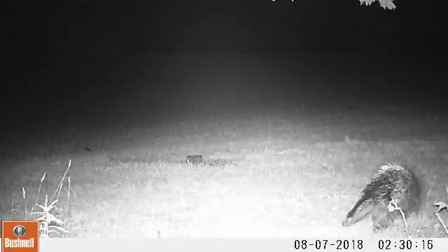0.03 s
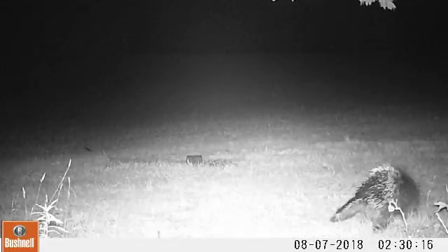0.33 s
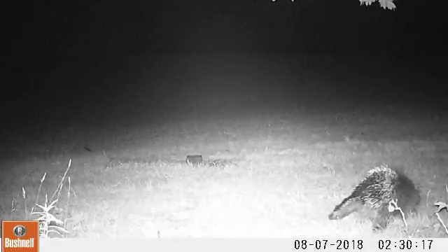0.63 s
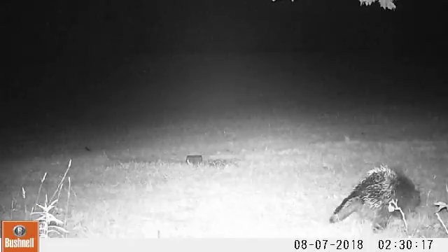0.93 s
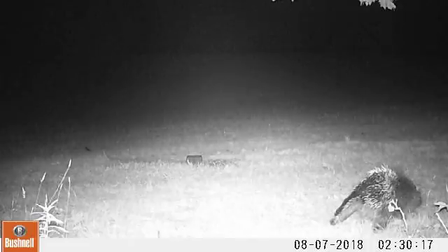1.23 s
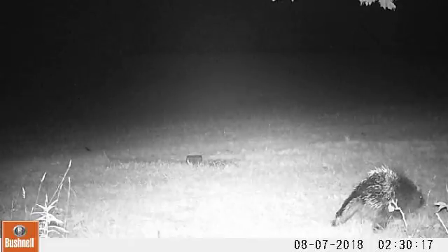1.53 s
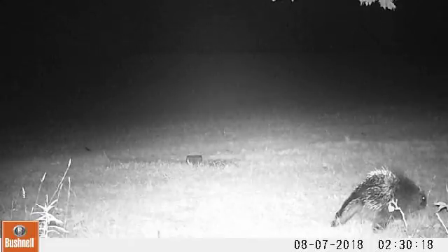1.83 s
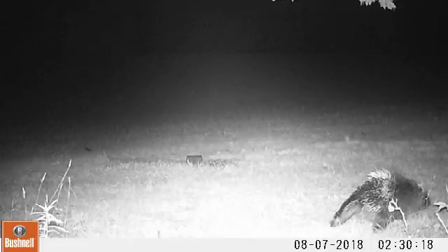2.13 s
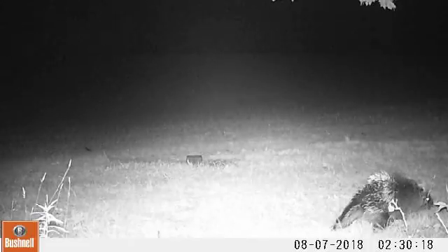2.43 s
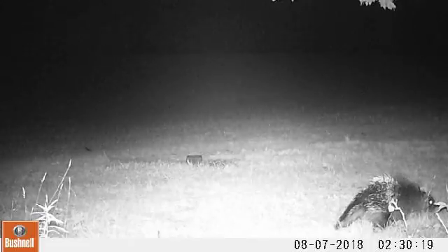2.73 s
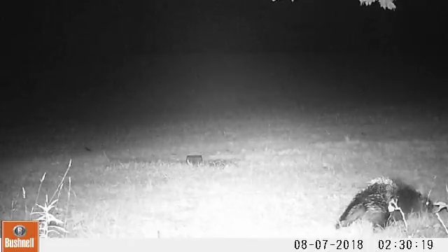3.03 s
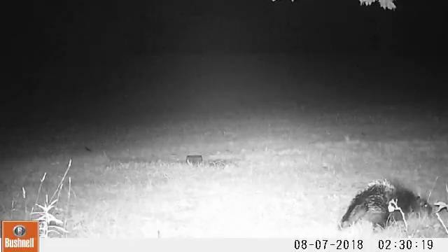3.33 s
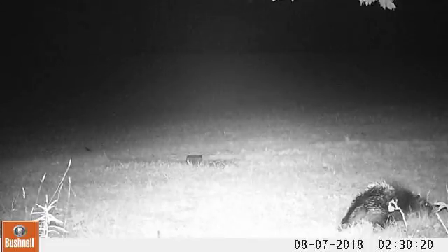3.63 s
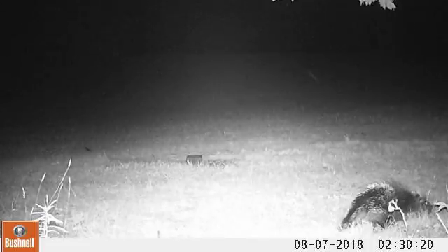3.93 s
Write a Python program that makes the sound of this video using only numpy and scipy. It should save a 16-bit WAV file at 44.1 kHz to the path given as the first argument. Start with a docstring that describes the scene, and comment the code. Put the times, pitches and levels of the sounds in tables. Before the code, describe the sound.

Crickets sound throughout in an open meadow at night. One trills evenly close by, while three others take turns chirping in quick threes, each about twice a second, over a high shimmer of distant insects. Low air rumble, slight hiss and a low electrical throb continue underneath. Faint, hoarse hoots come from far away at about 1.2, 1.7 and 2.4 seconds, with a longer, slightly louder one at 3 seconds.

```python
"""A meadow at night, heard from one camera microphone. From the start there is night air, a little hiss
and the camera's low electrical throb, while far-off trilling insects merge into a high shimmer.
Close by, one cricket trills throughout, every wing stroke a short falling tone; three field crickets
join one after another, chirping in threes. After about a second something far away hoots, faintly,
four times in all. Grass and trees scatter every call."""
import sys
import numpy as np
from scipy import signal
from scipy.fft import rfft, irfft
from scipy.io import wavfile

SR = 44100
rng = np.random.default_rng(int(sys.argv[2]) if len(sys.argv) > 2 else 0)


def dump_mix(stems):
    """Bounce the given channels to the path in sys.argv[1] as a 16-bit WAV at rate SR."""
    frames = np.atleast_2d(stems).T  # one column per channel
    limited = np.clip(frames, -1, 1)  # hard clip at full scale
    pcm = np.round(limited * 32767).astype(np.int16)
    wavfile.write(sys.argv[1], SR, pcm)


N = 176400
T = np.arange(N) / SR


def undb(db):
    """Decibels to gain."""
    return np.exp(np.asarray(db) * np.log(10) / 20)


def level(x, db):
    """Set the rms level."""
    return x * undb(db) / np.sqrt(np.mean(x ** 2))


def walk(rate):
    """A random drift that moves to a new value rate times a second; spread near 1."""
    return 1.2 * np.interp(T * rate, np.arange(256), rng.standard_normal(256))


def colour(x, points):
    """Filter by a curve of (Hz, dB) points."""
    hz, db = np.array(points).T
    bin_hz = np.arange(N // 2 + 1) * SR / N
    curve_db = np.interp(np.log(bin_hz + 1), np.log(hz), db)
    return irfft(rfft(x) * undb(curve_db), N)


def tone(hz, turns=0):
    """A sine that follows a pitch curve."""
    cycles = np.cumsum(hz) / SR + turns
    return np.sin(2 * np.pi * cycles)


def swell(progress):
    """A smooth rise and fall while progress goes from 0 to 1."""
    return np.abs(np.sin(np.pi * np.clip(progress, 0, 1)))


def night_air():
    """The low rumble of open air, with a little microphone hiss above it."""
    # Each row: frequency in Hz, relative noise density in dB.
    spectrum = [(8, -8.5), (18, -0.5), (35, -6.5), (70, -13.5), (140, -24), (280, -27), (420, -30),
                (600, -29), (900, -35), (1400, -39.5), (2100, -41), (3000, -38.5), (4200, -34.5),
                (6500, -39.5), (8800, -59)]
    return level(colour(rng.standard_normal(N), spectrum), db=-52.5)


def camera_throb(rate_hz=20, strong_beat_s=.14):
    """The camera's low electrical buzz, limping in groups of four beats."""
    # Each row: multiple of the beat rate, level in dB before the limp and drift.
    harmonics = [(1, -45), (2, -57), (3, -59), (4, -68), (5, -68.5), (6, -69), (7, -71.5), (8, -70.5),
                 (9, -71.5), (10, -77), (11, -89.5), (12, -79), (13, -80.5)]
    buzz = sum(undb(db) * np.sqrt(2) * tone(np.full(N, round(k) * rate_hz), rng.random())
               for k, db in harmonics)
    groups = (T - strong_beat_s) * rate_hz / 4
    limp = 1 + .18 * np.cos(2 * np.pi * groups)
    return buzz * limp * undb(.78 * walk(8))


def scatter(x, wet_db, t60_s=.29, samples=16384):
    """The direct sound plus a fading wash of echoes from grass and trees."""
    tail = rng.standard_normal(samples) * undb(-60 * T[:samples] / t60_s)
    tail *= undb(wet_db) / np.sqrt(np.sum(tail ** 2))
    return x + irfft(rfft(x) * rfft(tail, N), N)


def trill(strokes, duty, pitch_hz, fall_hz, uneven_db=2.5, detune_hz=14):
    """The wings close once per count of strokes; each closing starts a tone that sags as they slow."""
    stroke = np.floor(strokes).astype(int)
    strength, detune, phase = rng.standard_normal((512, 3))[stroke].T
    progress = (strokes - stroke) / duty
    envelope = swell(progress) ** 1.5 * undb(uneven_db * strength)
    hz = pitch_hz + detune_hz * detune + fall_hz * (.5 - progress)
    return envelope * tone(hz, phase)


def far_chorus():
    """A distant crowd of fast trillers, reaching the microphone mostly as echoes."""
    # Each row: frequency in Hz, relative gain in dB.
    spectrum = [(3800, -39), (4150, -33.5), (4500, -22.5), (4900, -5.5), (5250, -4.5), (5550, 3), (5750, 0),
                (6050, -8), (6280, -19), (6500, -17.5), (6850, -16.5), (7150, -12), (7550, -20),
                (8000, -33.5), (8500, -34.5), (8900, -46)]
    crowd = np.zeros(N)
    for hz in np.linspace(4100, 8700, 18):
        strokes = rng.random() + rng.uniform(45, 110) * T
        crowd += trill(strokes, duty=.9, pitch_hz=hz, fall_hz=700, detune_hz=140)
    return level(colour(scatter(crowd, wet_db=5.8), spectrum), db=-56)


def far_trillers():
    """Single distant insects that stand out of the chorus, each wandering in tempo and strength."""
    # Each row: pitch in Hz, strokes per second, fall per stroke in Hz, level in dB, echo gain in dB.
    insects = [(2428, 52, 90, -82, 4), (2675, 59, 220, -80.5, -4), (3300, 34, 170, -68, 3.5),
               (3498, 37, 120, -60, 3.5), (4834, 100, 260, -67, 1), (5035, 25, 90, -69, -0.5),
               (5215, 64, 490, -62, 1.5), (5460, 34, 170, -63, 7.5), (5610, 74.7, 100, -59.5, -1.5),
               (5620, 35.5, 100, -62.5, 0), (5850, 29, 50, -70, 4)]
    out = np.zeros(N)
    for hz, rate, fall, db, wet_db in insects:
        strokes = rng.random() + np.cumsum(rate * (1 + .012 * walk(4))) / SR
        song = trill(strokes, duty=.75, pitch_hz=hz, fall_hz=fall) * undb(.2 * walk(5))
        out += level(scatter(song, wet_db), db)
    return out


def near_cricket(rate_hz=34.255, stroke_s=.0205, first_middle_s=.0275, growth_db=6):
    """An even trill close to the microphone; each wing stroke grows louder as it falls, then stops."""
    duty = stroke_s * rate_hz
    strokes = (T - first_middle_s) * rate_hz + duty / 2 + .024 * walk(3.6)
    song = trill(strokes, duty, pitch_hz=3592, fall_hz=340, uneven_db=0, detune_hz=10)
    growth = undb(growth_db * (strokes % 1) / duty)
    return level(scatter(song * growth, wet_db=-5.5), db=-54.5)


def field_cricket(chirps, pitch_hz, fall_hz, bend, stroke_s, spacing_s, first_db, wet_db):
    """Three falling wing strokes to a chirp, no two alike; a higher bend holds the pitch longer."""
    out = np.zeros(N)
    for first_middle_s, db in chirps:
        for k in range(3):
            detune, uneven_db = rng.standard_normal(2)
            start = first_middle_s + k * spacing_s - stroke_s / 2
            span = slice(*np.searchsorted(T, [start, start + stroke_s]))
            progress = (T[span] - start) / stroke_s
            envelope = undb(db + uneven_db + first_db * (k == 0)) * swell(progress) ** .89
            out[span] += envelope * tone(pitch_hz + 20 * detune - fall_hz * progress ** bend)
    return scatter(out, wet_db)


def field_crickets():
    """Three chirpers out in the grass: one with short strokes, one with long, one farthest off."""
    # Each row: middle of the chirp's first stroke in seconds, nominal peak level in dB.
    short_chirps = [(-.035, -56), (.41, -57.5), (.84, -55), (1.292, -56.5), (1.762, -56), (2.318, -57),
                    (2.878, -58.5), (3.294, -57.5), (3.755, -56)]
    long_chirps = [(.062, -59), (.532, -59.5), (.99, -59.5), (1.458, -60.5), (1.925, -59), (2.345, -60.5),
                   (2.752, -59), (3.153, -60.5), (3.598, -58.5)]
    # Each entry: middle of the chirp's first stroke in seconds.
    far_times = [.215, .66, 1.154, 1.626, 2.11, 2.61, 3.079, 3.5]
    far_chirps = [(time, -58) for time in far_times]
    short = field_cricket(short_chirps, pitch_hz=4533, fall_hz=326, bend=1,
                          stroke_s=.014, spacing_s=.046, first_db=-3.5, wet_db=-3)
    long = field_cricket(long_chirps, pitch_hz=4430, fall_hz=607, bend=3,
                         stroke_s=.045, spacing_s=.049, first_db=-2, wet_db=-4.5)
    far = field_cricket(far_chirps, pitch_hz=4765, fall_hz=427, bend=1.1,
                        stroke_s=.016, spacing_s=.046, first_db=-1, wet_db=-5.5)
    return short + long + far


def far_hoots():
    """Faint calls from far away, each a wavering tone with a hoarse band of noise."""
    # Each row: start in seconds, length in seconds, pitch in Hz, the tone's peak level in dB.
    calls = [(1.158, 0.1, 510, -70.5), (1.694, .13, 500, -70.5), (2.40, 0.056, 521, -70.5),
             (2.992, 0.31, 506, -64)]
    # Each row: frequency in Hz, relative noise density in dB.
    rasp_spectrum = [(330, -28), (470, -4), (650, -2.5), (800, -8), (1100, -32.5)]
    rasp = level(colour(rng.standard_normal(N), rasp_spectrum), db=-6.5)
    out = np.zeros(N)
    for start, length, hz, db in calls:
        voice = tone(hz * (1 + .0043 * walk(25))) + rasp
        out += undb(db) * swell((T - start) / length) ** .5 * voice
    return scatter(out, wet_db=-1.8)


def scene():
    """The insects and the hoots over night air and throb, at one microphone."""
    bed = night_air() + camera_throb()
    insects = far_chorus() + far_trillers() + near_cricket() + field_crickets()
    return (bed + insects + far_hoots())[None]


def record(dry):
    """The camera cuts the top steeply."""
    top_hz = 8780
    return signal.sosfilt(signal.ellip(10, .2, 80, top_hz, fs=SR, output="sos"), dry)


dry = scene()
out = record(dry)
dump_mix(out)
```